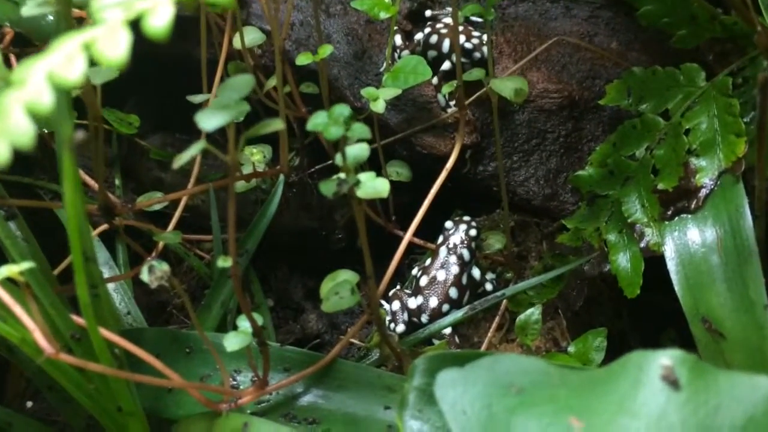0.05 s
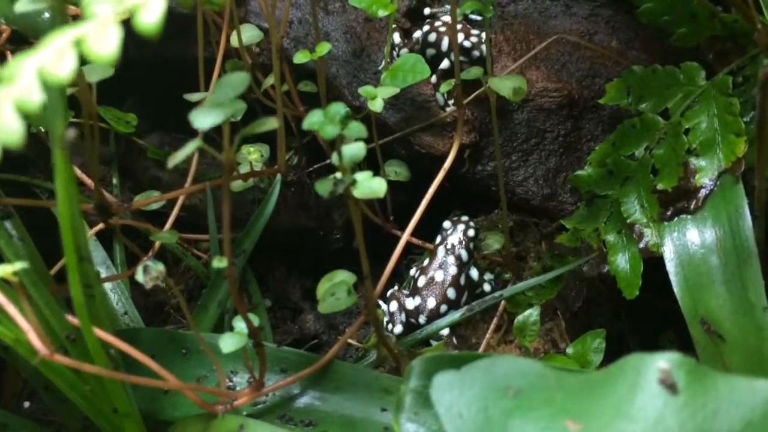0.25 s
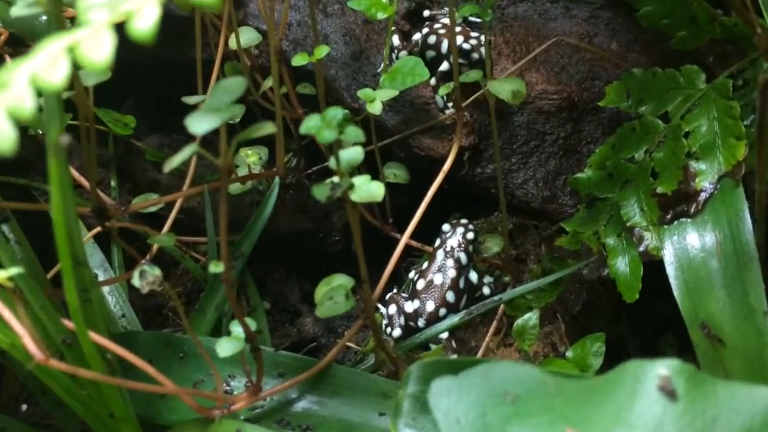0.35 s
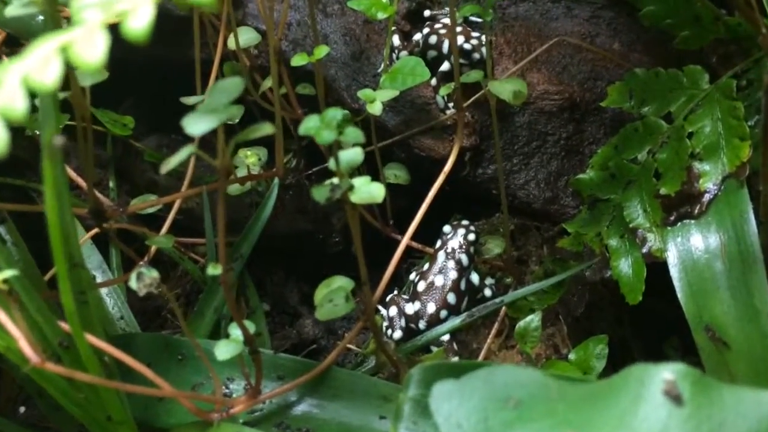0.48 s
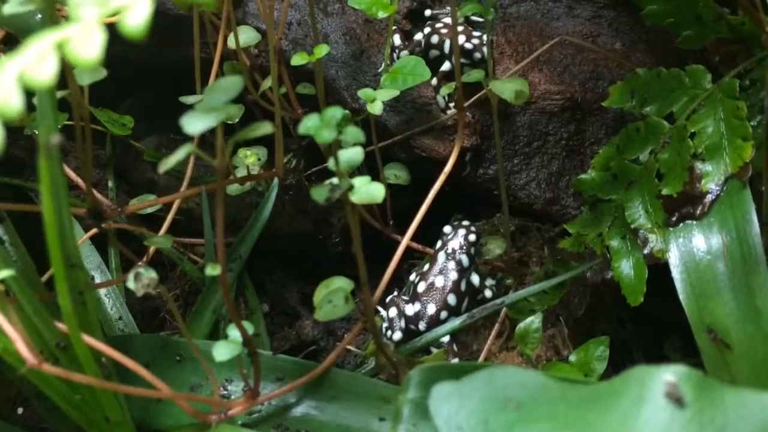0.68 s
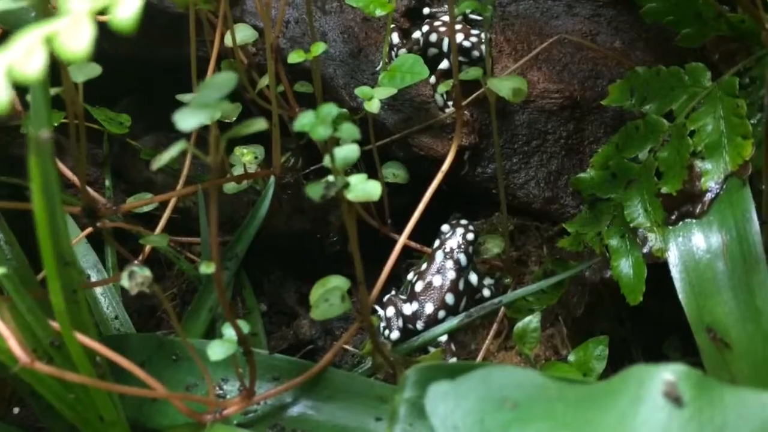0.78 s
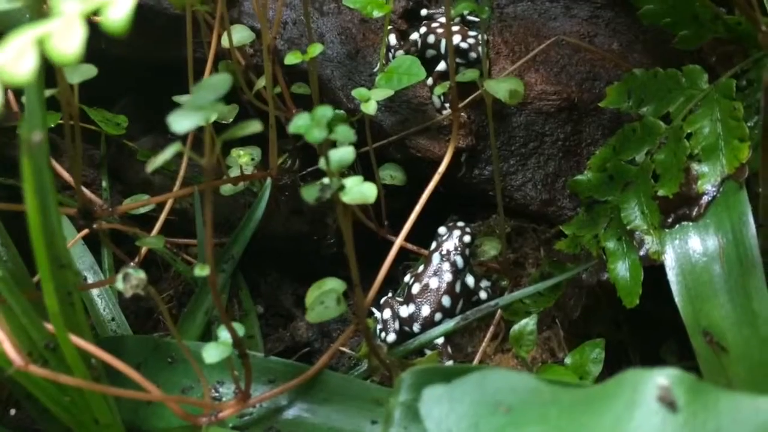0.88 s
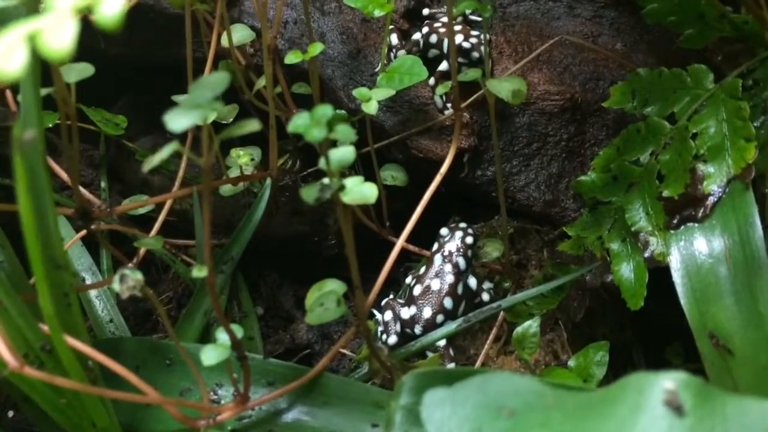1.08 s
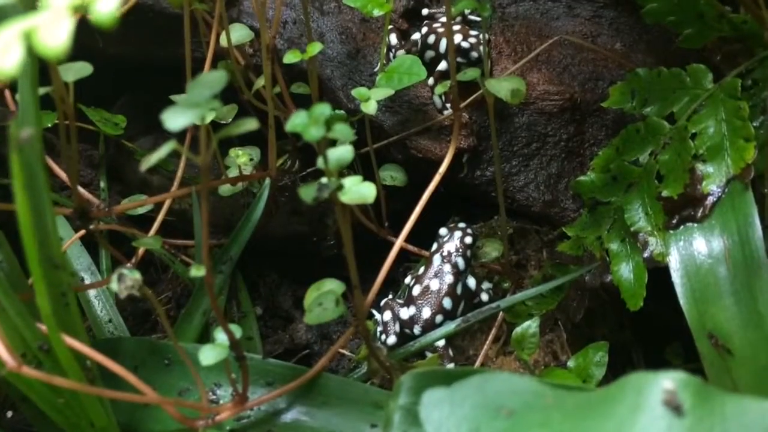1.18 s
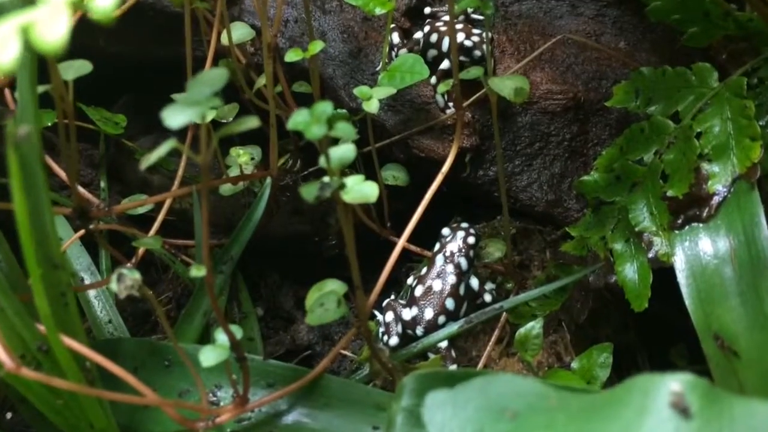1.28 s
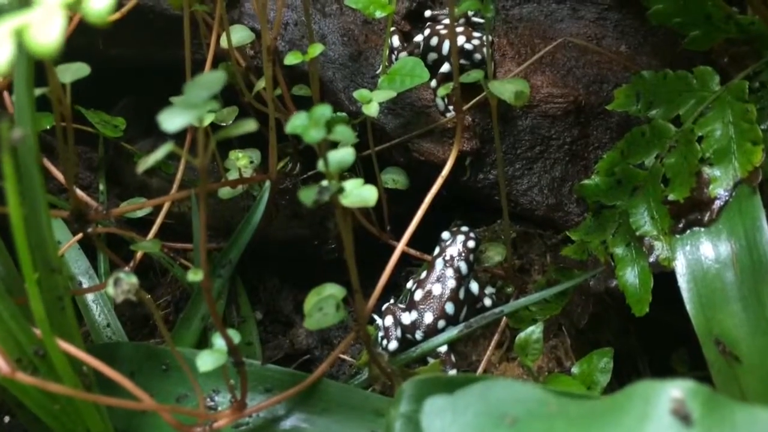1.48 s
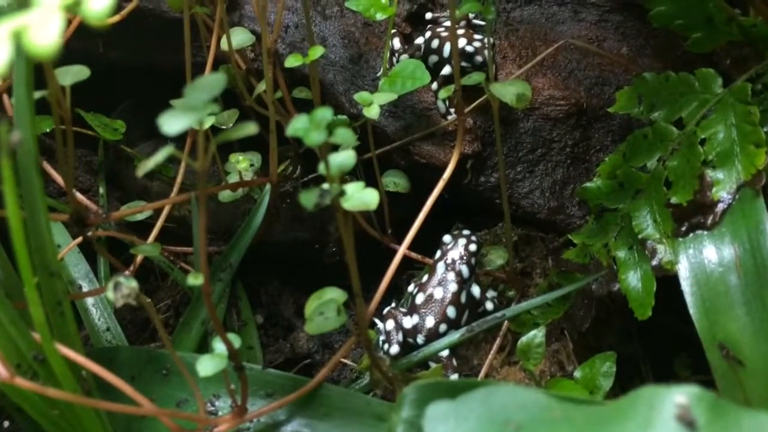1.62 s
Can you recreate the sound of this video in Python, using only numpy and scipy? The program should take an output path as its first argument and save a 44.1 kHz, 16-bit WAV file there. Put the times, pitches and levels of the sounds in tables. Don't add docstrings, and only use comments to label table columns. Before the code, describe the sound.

One raspy, rattling frog buzz lasting about a second, close by, with a quiet low hum beneath

```python
import sys
import numpy as np
from scipy import signal
from scipy.fft import rfft, irfft, next_fast_len
from scipy.io import wavfile
from scipy.ndimage import map_coordinates

SR = 44100
rng = np.random.default_rng(int(sys.argv[2]) if len(sys.argv) > 2 else 0)


def to_linear_factor(level_db):
    exponent = np.asarray(level_db, float) / 20
    return 10 ** exponent


def store_pcm(level_fs):
    pcm = np.round(np.clip(level_fs, -1, 1) * 32767).astype(np.int16)
    wavfile.write(sys.argv[1], SR, np.atleast_2d(pcm).T)


N = 72765

# (frequency [Hz], level [dB rms], unsteadiness [dB])
MOTOR_HUM = [(141.5, -58.5, 0.5), (210.2, -63, 3), (266, -90, 9.5), (492, -79.5, 3.5)]
# (frequency [Hz], density [dB per Hz])
AIR_HISS = [(25, -11), (60, -9.5), (115, -0.5), (250, -9.5), (600, -20.5), (3000, -27.5), (8000, -36.5),
            (15500, -39)]
# (frequency [Hz], width [Hz], level [dB rms])
DUCT_MODES = [(411, 69, -69), (914, 200, -73), (1360, 560, -76), (2148, 290, -74.5)]
# (time [s], level [dB], ring frequency [Hz], ring share [ratio])
DROPS = [
    (0.134, -41, 3150, 0.94),
    (1.523, -64, 6000, .15),
    (1.531, -62.5, 11480, .15),
    (1.582, -60.5, 6200, .2),
    (1.6112, -54, 8020, .15),
    (1.617, -50, 8200, .2),
    (1.6214, -54.5, 5500, 0.55),
]
# (first click [s], gap to second [ms], gap to third [ms]), 0 = no click
CLICK_GROUPS = [(0.2156, 0.0, 0.0), (0.2282, 2.32, 0.0), (0.242, 1.47, 0.0), (0.2556, 1.82, 0.0),
                (0.2703, 1.71, 0.0), (0.2834, 1.54, 1.56), (0.2984, 1.37, 1.9), (0.3139, 1.24, 0.0),
                (0.3264, 1.34, 1.27), (0.3406, 1.29, 1.22), (0.3558, 1.23, 1.05), (0.3715, 1.13, 1.52),
                (0.3856, 1.04, 1.46), (0.3992, 1.19, 1.07), (0.4152, 1.27, 0.0), (0.4283, 1.46, 1.24),
                (0.4435, 1.55, 1.66), (0.4582, 1.22, 1.34), (0.4733, 1.45, 0.0), (0.4877, 1.56, 0.0),
                (0.5018, 1.49, 1.51), (0.5169, 1.32, 1.93), (0.5321, 1.38, 0.0), (0.5464, 1.6, 0.0),
                (0.5615, 1.6, 0.0), (0.5754, 1.56, 1.36), (0.5907, 1.5, 1.54), (0.6069, 1.79, 0.0),
                (0.6223, 1.92, 0.0), (0.6363, 1.34, 2.6), (0.6526, 2.22, 0.0), (0.6667, 1.42, 0.0),
                (0.6818, 1.76, 0.0), (0.6967, 1.63, 0.0), (0.7116, 1.58, 0.0), (0.7258, 1.61, 1.93),
                (0.7419, 1.64, 0.0), (0.7571, 2.3, 0.0), (0.7718, 1.55, 0.0), (0.7863, 1.72, 0.0),
                (0.8021, 0.0, 0.0), (0.8166, 2.04, 0.0), (0.8329, 0.0, 0.0), (0.8483, 0.0, 0.0),
                (0.8623, 1.89, 0.0), (0.8771, 1.65, 0.0), (0.8923, 1.76, 0.0), (0.9069, 1.46, 0.0),
                (0.9216, 1.79, 0.0), (0.937, 1.83, 0.0), (0.9535, 2.16, 0.0), (0.9695, 1.93, 0.0),
                (0.9851, 2.11, 0.0), (1.0002, 1.81, 0.0), (1.0156, 1.89, 0.0), (1.0316, 0.0, 0.0),
                (1.0468, 1.86, 0.0), (1.0633, 0.0, 0.0), (1.0797, 0.0, 0.0), (1.1443, 1.97, 0.0)]
# (time [s], level under a full click [dB])
STRAY_CLICKS = [(0.3295, -9.5), (0.3443, -2), (.3457, -6.5), (0.347, -9.5), (0.3475, -8.5), (0.3596, -2),
                (.3615, -11), (0.3765, -9), (0.3772, -13), (.3797, -10), (0.3968, -15), (0.397, -12),
                (0.4032, -3.5), (0.5967, -5), (.8655, -9.5), (1.0505, -7.5)]
# (time [s], click peak [dB], sac tuning [ratio], upper modes [dB], rasp [dB],
# sac ring [dB], brightness [dB per octave])
CALL_EFFORT = [
    (0.215, -20, 0.955, 4, -29, -1.9, -5),
    (0.282, -17.5, 0.96, 5, -27, -0.9, -2.5),
    (.35, -15, 1.016, 5.5, -16.5, -1.5, -1.8),
    (.43, -15, 0.999, 0.5, -16.5, -0.7, -0.2),
    (.56, -15.5, 1.0015, -2, -16, -0.54, 1.4),
    (.8, -16, 1, -0.3, -21, -0.2, -.6),
    (1.01, -15, 0.995, 0, -20, 0.6, -.6),
    (1.08, -17.5, 1.006, 5, -27, -1.1, -2),
    (1.145, -19, 0.99, 7.5, -29.5, -2.5, -8),
]
# (frequency [Hz], width [Hz], signed gain [ratio])
THROAT_MODES = [(1446, 150, 0.5), (2025, 280, -1.25), (3102, 648, 17), (4234, 453, -13.5), (4680, 326, -4),
                (6660, 1200, 3)]
# (frequency [Hz], width [Hz], signed gain [ratio])
UPPER_MODES = [(6265, 390, 0.83), (8700, 200, 0.82), (9720, 180, -1.98), (11770, 860, -0.45),
               (12980, 700, .25)]
# (frequency [Hz], width [Hz], signed gain [ratio])
SAC_RING = (3597, 180, -37.5)
# (frequency [Hz], level [dB])
RASP_COLOUR = [(1000, -32.5), (2500, -4), (4500, 3.5), (8000, -0.5), (14000, -28)]
# (delay [ms], signed gain [ratio])
NEAR_ECHOES = [(2.244, -0.2), (2.68, 0.11), (3.22, 0.14), (4.04, .036), (5.27, -0.095), (6.23, 0.055),
               (6.49, -0.005), (7.47, -0.086), (9.1, 0.014)]
# (frequency [Hz], width [Hz], level [dB])
GLASS_PANES = [(3755, 61, -15.5), (3350, 51, -26.5)]
# (frequency [Hz], decay time t60 [s])
TANK_DECAY = [(1000, 0.03), (3600, 0.04), (8000, 0.015), (14000, .022)]
# (frequency [Hz], width [Hz], level [dB])
ROOM_BAND = (3560, 160, 9)
# (frequency [Hz], level [dB])
MIC_RESPONSE = [(20, -13.5), (45, 0), (12500, -0.5), (14500, -1.5), (15300, -4.5), (15600, -22),
                (16400, -30)]


def unit(x):
    return x / np.sqrt(np.mean(x ** 2) + 1e-20)


def along(points, hz):
    f, v = np.transpose(points)
    return np.interp(np.log(hz + 1), np.log(f + 1), v)


def wobble(rate):
    knots = rng.standard_normal(int(N * rate / SR) + 4)
    return map_coordinates(knots, [np.arange(N) * rate / SR])


def filtered(x, response):
    m = next_fast_len(N + SR // 2)
    return irfft(rfft(x, m) * response(np.fft.rfftfreq(m, 1 / SR)), m)[..., :N]


def peak(f, hz, width_hz):
    return 1j * f * width_hz / (hz * hz - f * f + 1j * f * width_hz)


def high_pass(f, hz):
    return (1j * f / (hz + 1j * f)) ** 2


def motor():
    t = np.arange(N) / SR
    hum = np.zeros(N)
    for hz, db, sway_db in MOTOR_HUM:
        level = np.sqrt(2) * to_linear_factor(db + sway_db * wobble(12))
        hum += level * np.sin(2 * np.pi * hz * t + 0.5 * wobble(6.5))
    return hum


def moving_air():
    hiss = filtered(rng.standard_normal(N), lambda f: to_linear_factor(along(AIR_HISS, f)))
    air = to_linear_factor(-60.5) * unit(hiss)
    for hz, width_hz, db in DUCT_MODES:
        band = filtered(rng.standard_normal(N), lambda f: peak(f, hz, width_hz) ** 2)
        air += to_linear_factor(db + 1.6 * wobble(8.37)) * unit(band)
    return air


def drops():
    crack_t60_s, ring_t60_s = 0.0095, 0.0066
    out, t = np.zeros(N + SR), np.arange(SR // 20) / SR
    for s, db, hz, ring_share in DROPS:
        crack = rng.standard_normal(len(t)) * to_linear_factor(-60 * t / crack_t60_s)
        ring = np.sin(2 * np.pi * hz * t) * to_linear_factor(-60 * t / ring_t60_s)
        out[round(s * SR):][:len(t)] += to_linear_factor(db) * (0.52 * crack + ring_share * ring)
    return filtered(out[:N], lambda f: high_pass(f, 2200) / (1 + (f / 12300) ** 10))


def click_times():
    rested_ms, tired_db_per_ms = 1.35, 7
    start, *later = np.transpose(CLICK_GROUPS)
    gaps = np.array([0 * start, *later]).T
    times = start[:, None] + np.cumsum(gaps, axis=1) / 1000
    sounding = gaps > 0
    sounding[:, 0] = True
    gaps[:, 0] = rested_ms
    weak_db = tired_db_per_ms * np.minimum(gaps[sounding] - rested_ms, 0)
    stray_s, stray_db = np.transpose(STRAY_CLICKS)
    return np.append(times[sounding], stray_s), np.append(weak_db, stray_db)


def throat_sac(f, tune, edge_db, ring_db, bright_db):
    body = sum(g * peak(f, hz * tune ** 0.45, width_hz) for hz, width_hz, g in THROAT_MODES)
    ring_hz, ring_width_hz, ring_gain = SAC_RING
    body += ring_gain * to_linear_factor(ring_db) * peak(f, ring_hz * tune, ring_width_hz)
    body *= to_linear_factor(bright_db * np.log2(np.maximum(f / 4000, 1)))
    for k, (hz, width_hz, gain) in enumerate(UPPER_MODES):
        body += gain * to_linear_factor(edge_db[k]) * peak(f, hz, width_hz)
    return body


def throat_opening(f, times):
    low_hz, fold_gone_s = 1280, 0.56
    floor = (-f * f / (low_hz ** 2 - f * f + 0.7j * f * low_hz)) ** 2
    slack = np.clip(2 * (fold_gone_s - times) / fold_gone_s, 0, 0.9)[:, None]
    return floor * (1 - slack * peak(f, 9070, 630))


def near_walls(f):
    echoes = sum(g * np.exp(-2j * np.pi * f * ms / 1000) for ms, g in NEAR_ECHOES)
    return 1 + echoes / (1 + 1j * f / 4000)


def frog():
    times, weak_db = click_times()
    size, lead = 2048, 64
    rise_s, rasp_t60_s = 0.00014, 0.014
    size_db, tune_jitter, mode_db = 1.53, 0.0034, 1.5
    at, *columns = np.transpose(CALL_EFFORT)
    effort = [np.interp(times, at, c)[:, None] for c in columns]
    level_db, tuning, edge_db, rasp_db, ring_db, bright_db = effort
    luck = np.clip(rng.standard_normal((len(times), 2 + len(UPPER_MODES), 1)), -2, 2)
    click_db = level_db + weak_db[:, None] + size_db * luck[:, 0]
    tune = tuning * (1 + tune_jitter * luck[:, 1])
    edges_db = [edge_db + mode_db * luck[:, 2 + k] for k in range(len(UPPER_MODES))]

    f = np.fft.rfftfreq(size, 1 / SR)
    snap = high_pass(f, 1500) / (1 + 1j * f / 9000) ** 2
    voiced = throat_sac(f, tune, edges_db, ring_db, bright_db) * snap
    puff_db = rasp_db - 60 * np.arange(size) / SR / rasp_t60_s
    puff = rng.standard_normal((len(times), size)) * to_linear_factor(puff_db)
    rasp = rfft(puff) * to_linear_factor(along(RASP_COLOUR, f))

    onset = (times - rise_s) * SR
    late = np.exp(-2j * np.pi * f * (lead + onset % 1)[:, None] / SR)
    spectrum = (voiced + rasp) * near_walls(f) * late * throat_opening(f, times)
    clicks = irfft(spectrum, size) * to_linear_factor(click_db)
    place = onset.astype(int)[:, None] - lead + np.arange(size)
    return np.bincount(place.ravel(), clicks.ravel(), N)[:N]


def panes(voice):
    delayed = np.pad(voice, (SR // 300, 0))[:N]
    return filtered(delayed, lambda f: sum(to_linear_factor(db) * peak(f, hz, w) for hz, w, db in GLASS_PANES))


def tail(x, t60_of, wait_s):
    hz, t, z = signal.stft(rng.standard_normal(SR // 2), SR, nperseg=128)
    h = signal.istft(z * to_linear_factor(-60 * t / t60_of(hz)[:, None]), SR, nperseg=128)[1]
    return signal.fftconvolve(np.pad(x, (int(wait_s * SR), 0)), h / np.linalg.norm(h))[:N]


def tank(voice):
    return to_linear_factor(-20.5) * tail(voice, lambda hz: along(TANK_DECAY, hz), 0.004)


def room(voice):
    hz, width_hz, db = ROOM_BAND
    far = filtered(voice, lambda f: 1 + to_linear_factor(db) * peak(f, hz, width_hz))
    return to_linear_factor(-34) * tail(far, lambda f: 0.1 + 0 * f, 0.027)


def scene():
    background = motor() + moving_air() + drops()
    voice = frog()
    call = voice + panes(voice) + tank(voice) + room(voice)
    return (background + call)[None]


def band_limit(x):
    return signal.sosfilt(signal.butter(12, 16470, fs=SR, output="sos"), x)


def record(dry):
    mix = filtered(dry, lambda hz: to_linear_factor(along(MIC_RESPONSE, hz)))
    return band_limit(mix)


dry = scene()
out = record(dry)
store_pcm(out)
```